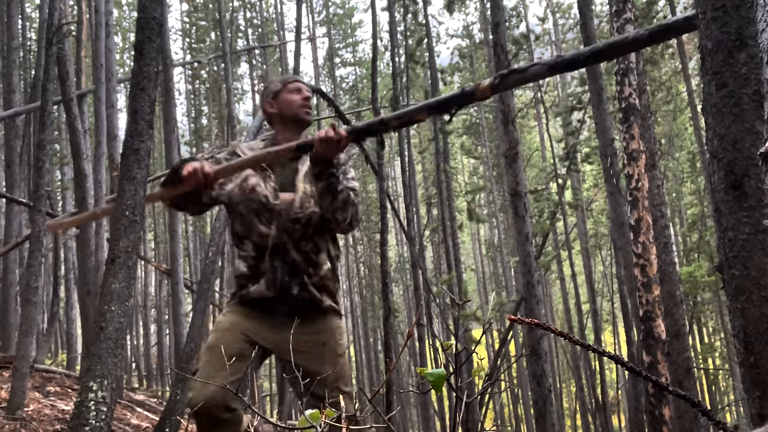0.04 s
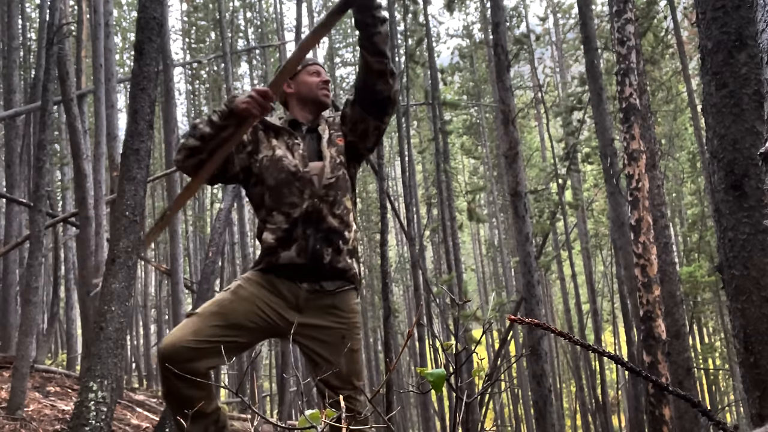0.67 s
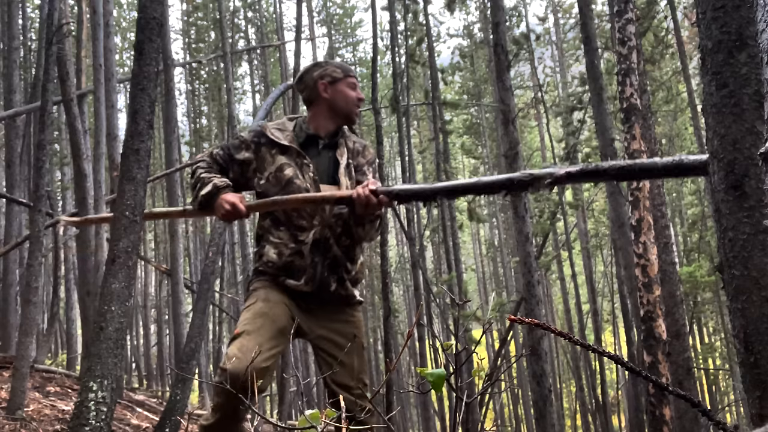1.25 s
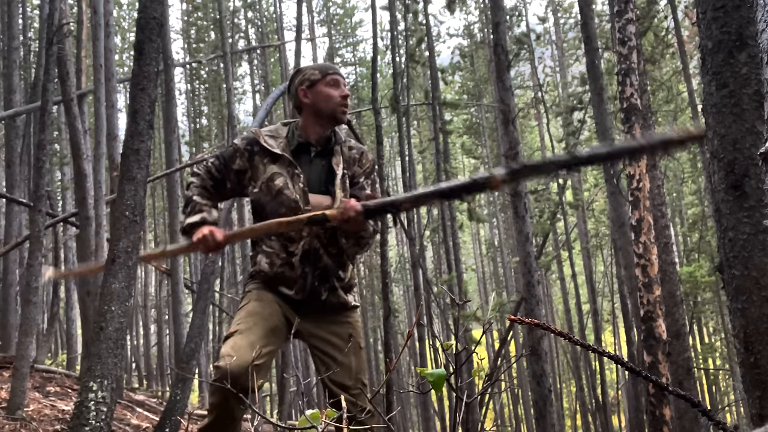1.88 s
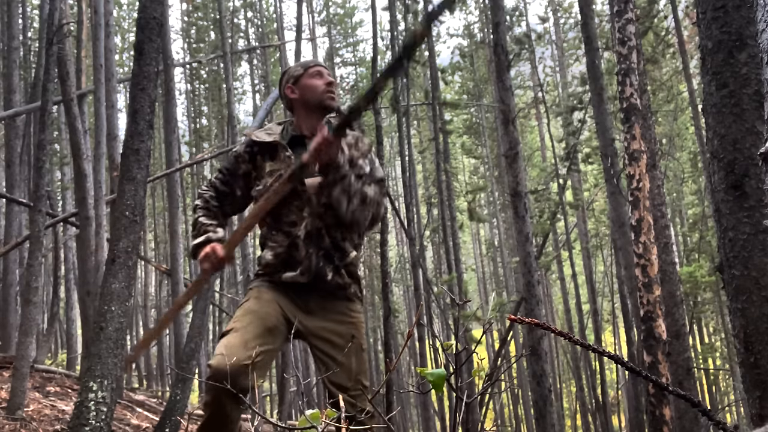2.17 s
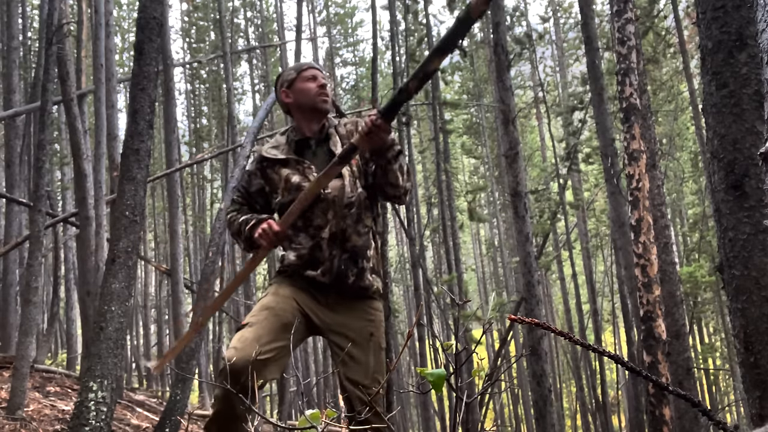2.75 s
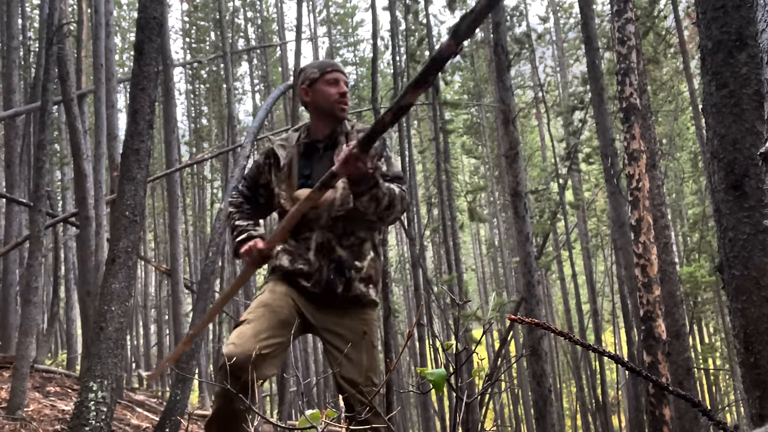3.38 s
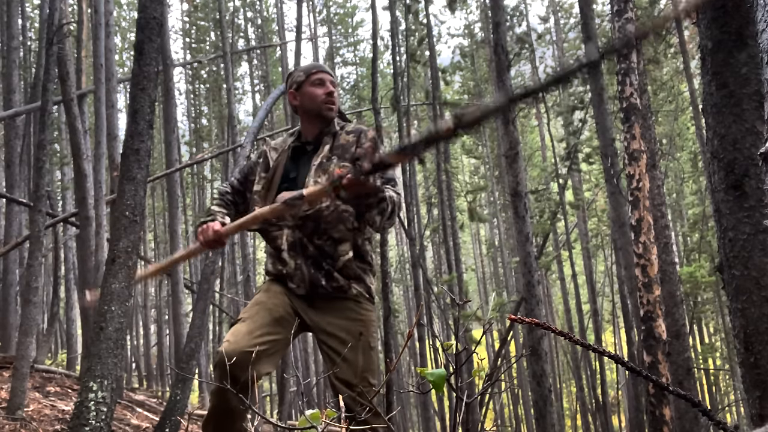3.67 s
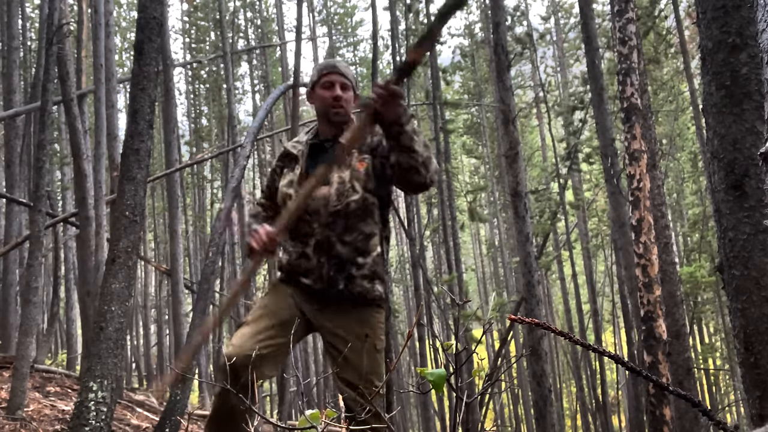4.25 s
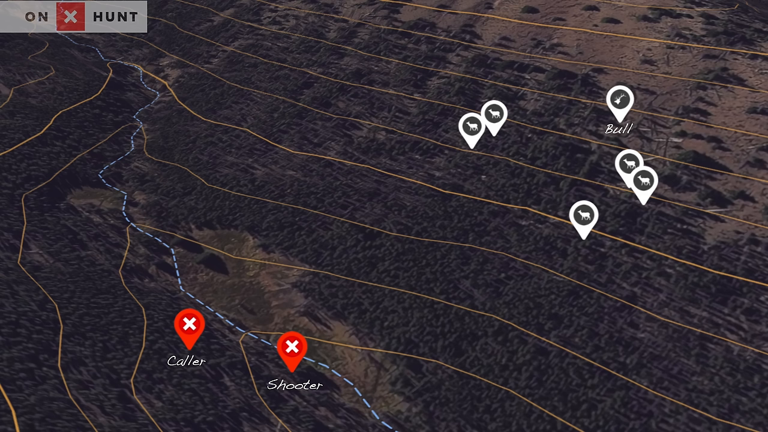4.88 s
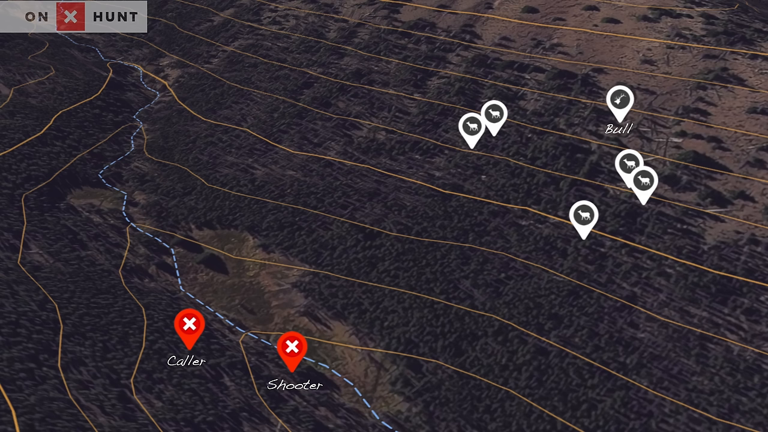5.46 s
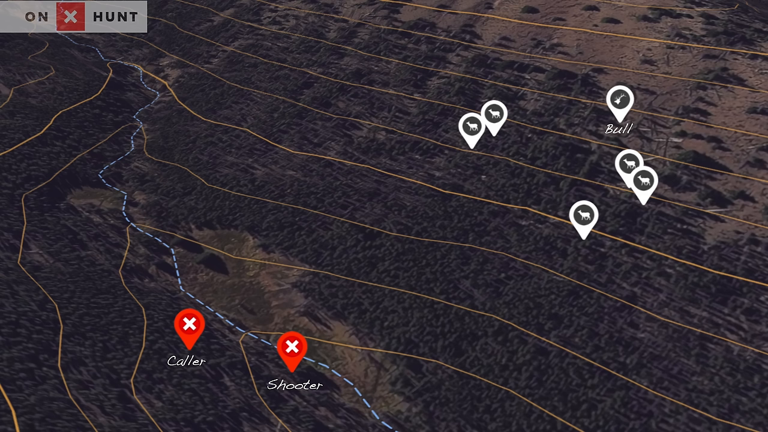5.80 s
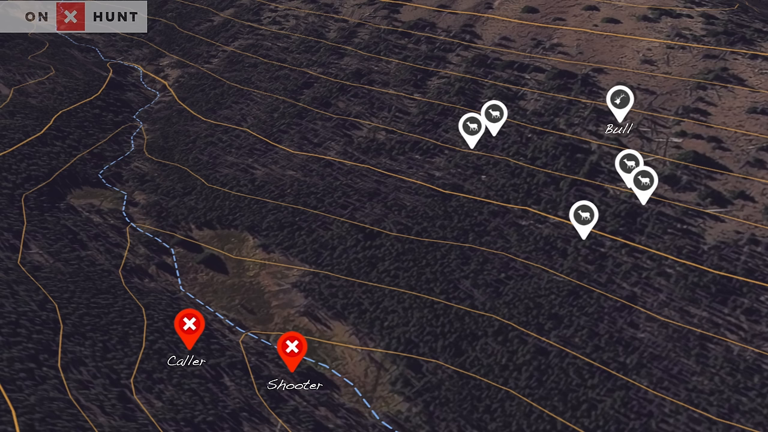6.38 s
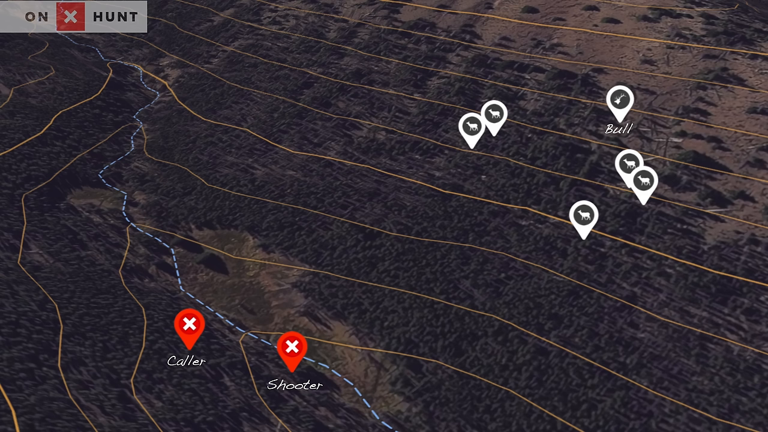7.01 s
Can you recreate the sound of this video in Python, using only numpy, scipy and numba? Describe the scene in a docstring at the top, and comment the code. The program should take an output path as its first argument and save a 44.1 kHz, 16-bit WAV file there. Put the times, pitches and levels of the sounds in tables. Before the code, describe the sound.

A long dead branch is struck and raked against conifer trunks a few metres away. Sharp wooden knocks and crackling scrapes come first, then a short lull. More blows follow, with dry twigs snapping, bark rasping and a low rumble as the branch swings. A last cluster of hard knocks gives way to a few small cracks, over a faint forest hush.

```python
"""A long dead branch is knocked and raked against conifer trunks, a few metres away.
Each blow thumps the branch, knocks on the trunk, splinters dry bark and rebounds; dead twigs snap off.
In swelling scrapes the wood drags over bark in tiny slips and shudders; swinging it adds a low rumble.
The trunks scatter the hits and scrapes back over a faint forest hush and ticking needles."""
import sys
import numpy as np
from scipy import signal
from scipy.fft import rfft, irfft, next_fast_len
from scipy.io import wavfile
from scipy.ndimage import uniform_filter1d
from numba import njit

SR = 44100
rng = np.random.default_rng(int(sys.argv[2]) if len(sys.argv) > 2 else 0)


def output_pcm(signal):
    """Save a mono or channel-first signal as 16-bit PCM at the path in sys.argv[1].

    Samples are clipped to [-1, 1] before scaling.
    """
    pcm = np.clip(np.atleast_2d(signal).T, -1, 1) * 32767
    wavfile.write(sys.argv[1], SR, np.round(pcm).astype(np.int16))


N = 314741
TIME = np.arange(N) / SR
CONTROL_TIME = np.arange(0, N / SR, .001)  # envelope grid, one point a millisecond


def undb(db):
    """Decibels to gain."""
    return 10 ** (np.asarray(db) / 20)


def unit(x):
    """Scale to rms 1."""
    return x / np.sqrt(np.mean(x ** 2) + 1e-30)


def along(points, hz):
    """Read (freq_hz, value) points on a log-frequency axis."""
    point_hz, value = np.transpose(points)
    return np.interp(np.log(hz + 1), np.log(np.maximum(point_hz, 1)), value)


def colour(x, points):
    """Causal EQ through (freq_hz, gain_db) points, built from the cepstrum of its log gain."""
    size = 2 * next_fast_len(x.shape[-1] // 2 + 2048)
    hz = np.arange(size // 2 + 1) * SR / size
    cepstrum = irfft(np.log(undb(along(points, hz))))
    cepstrum[1:size // 2] *= 2
    cepstrum[size // 2 + 1:] = 0
    return irfft(rfft(x, size) * np.exp(rfft(cepstrum)))[..., :x.shape[-1]]


@njit
def svf(x, tuning, damping):
    """State-variable band-pass with a moving centre."""
    y, band, low = np.empty(len(x)), 0., 0.
    for i in range(len(x)):
        g = tuning[i]
        v = (band + g * (x[i] + 1e-18 - low)) / (1 + g * (g + damping))
        band, low = 2 * v - band, low + 2 * g * v
        y[i] = damping * v
    return y


def resonate(x, hz, q):
    """A resonance of sharpness q at a steady or moving pitch."""
    tuning = np.tan(np.pi * np.clip(hz, 20, SR / 3) / SR)
    return svf(x, tuning * np.ones(len(x)), 1 / float(q))


def walk(rate_hz, size):
    """Random levels held 1 / rate_hz seconds and slewed; spread near 1."""
    hold = max(int(SR / rate_hz), 1)
    steps = np.repeat(rng.standard_normal(size // hold + 2), hold)
    return unit(uniform_filter1d(steps, hold)[hold:hold + size])


def swell(peak_s, rise_s, fall_s):
    """Power envelopes, one row a movement: up 20 dB over rise_s, down 20 dB over fall_s."""
    late_s = CONTROL_TIME - peak_s[:, None]
    return undb(-20 * np.maximum(-late_s / rise_s[:, None], late_s / fall_s[:, None])) ** 2


def swell_gain(swells, db, rest_db):
    """The gain of overlapping movements over a resting level, sample by sample."""
    return np.interp(TIME, CONTROL_TIME, np.sqrt(undb(db) ** 2 @ swells + undb(rest_db) ** 2))


def swell_pitch(swells, db, hz, rest_db, rest_hz):
    """Where movements overlap, the pitch leans to the stronger one."""
    power, rest = undb(db) ** 2, undb(rest_db) ** 2
    mean_hz = ((power * hz) @ swells + rest * rest_hz) / (power @ swells + rest)
    return np.interp(TIME, CONTROL_TIME, mean_hz)


# Tone of the forest bed: freq_hz, gain_db
HUSH_EQ = [(20, -18.5), (55, 11), (100, -3.5), (280, -3.5), (550, 2.5), (1000, -2.5), (2000, -7.5),
           (3500, -16.5), (7000, -25), (11500, -32), (14000, -28), (16000, -58)]
def hush(level_db):
    """Faint air in the treetops, alike on both sides only in the bass."""
    apart = colour(rng.standard_normal((2, N)), [(100, -7.5), (400, -3), (900, -2.5)])
    common = colour(rng.standard_normal(N), [(100, 0.5), (400, -4.5), (900, -19.0), (3000, -23.5)])
    air = unit(colour(apart + common, HUSH_EQ))
    drift_db, balance_db = .5 * walk(2.2, N), np.array([[-.7], [.7]])
    return air * undb(level_db + drift_db + balance_db)


def forest_tail(x, db, t60_s):
    """The stand of trunks gives a thin reverb tail with a dull top."""
    t = TIME[:SR]
    tail = rng.standard_normal((2, SR)) * np.exp(-np.log(1000) * t / t60_s) * (1 - np.exp(-t / 0.0069))
    tail = colour(tail, [(80, -9), (600, -8.0), (2000, 0.0), (6000, 4), (14000, -26.0)])
    return signal.fftconvolve(x[None], undb(db) * unit(tail) / np.sqrt(SR), axes=1)[:, :N]


def scatter(x, db, spread_s):
    """Early reflections off the ground and near trunks, different for every point of contact."""
    t = TIME[:SR // 30]
    paths = rng.standard_normal((2, len(t))) * np.exp(-t / spread_s)
    return undb(db) * signal.fftconvolve(x[None], unit(paths) / np.sqrt(len(t)), axes=1)[:, :len(x)]


# Phase between the two microphone ports: freq_hz, left_lead_rad
STEREO_PHASE = [(0, 1), (600, -2), (900, 0.5), (1400, -0.9), (1800, -2.5), (2600, -3.5), (3200, -5.5),
                (3900, -6.5), (5400, -8), (6200, -11.5), (7100, -10.5), (8900, -10), (11000, -6),
                (12300, -6), (13700, -2.5), (15000, -3)]
# Balance between them: freq_hz, left_minus_right_db
STEREO_BALANCE = [(60, -1), (200, -4), (380, -5.5), (650, -13), (1000, -12), (1400, -2.5), (2400, -5.5),
                  (4400, -3), (8000, 0), (15000, 0)]
def ports(x):
    """Mono to stereo: the microphone housing delays and shades the sound differently at its two ports."""
    hz = np.arange(N + 1) * SR / (2 * N)
    ratio = undb(along(STEREO_BALANCE, hz))
    turn = np.exp(.5j * np.interp(hz, *np.transpose(STEREO_PHASE)))
    pair = np.array([ratio * turn, 1 / turn]) * np.sqrt(2 / (1 + ratio ** 2))
    return irfft(rfft(x, 2 * N) * pair)[:, :N]


def litter(rate_hz, db, spread_db):
    """Dry needles and bark crumbs tick faintly at random."""
    count = int(rate_hz * N / SR)
    out, t = np.zeros(N + SR), TIME[:SR // 50]
    for when, brightness, softness in rng.random((count, 3)):
        crumb = fracture(t, splinter_s=.0012, break_s=.0003, splinter_db=-9.0)
        tick = unit(resonate(crumb, 2000 * 5 ** brightness, q=1.2))
        start = int(when * N)
        out[start:start + len(t)] += undb(db - spread_db * softness) * tick
    return out[:N]


def rumble(hz, gain):
    """Low random wobble around a pitch, mostly alike left and right."""
    shakes = [resonate(resonate(noise, hz, q=0.99), hz, q=1.0) for noise in rng.standard_normal((2, N))]
    common, apart = (unit(shake / np.sqrt(hz)) * gain for shake in shakes)
    return undb(-1.0) * common + undb(-5) * apart * np.array([[1], [-1]])


# Low swells under the action: peak_s, rise_s, fall_s, level_db, pitch_hz
SWING_CUES = [(0.0, .05, .09, -43.5, 98), (0.42, .35, 0.23, -44, 75.2), (0.95, 0.12, 0.22, -46, 70),
              (1.2, .2, 0.095, -36.5, 75), (1.68, 0.35, 0.1, -60.5, 115), (2.675, .03, 0.023, -40, 125),
              (3.003, 0.049, .04, -39, 54), (3.072, 0.017, .035, -35, 64), (3.165, 0.028, 0.13, -37, 84.7),
              (3.28, 0.17, 0.059, -41.5, 57.1), (3.607, 0.034, .15, -43, 57), (3.75, 0.11, 0.38, -45, 58.1),
              (3.95, .35, .3, -40, 64.2), (4.36, 0.073, 0.2, -32.5, 68), (4.435, 0.076, 0.11, -32, 60.7),
              (4.55, 0.046, 0.14, -36.5, 62.4), (4.707, .035, .09, -40.5, 62),
              (5.757, 0.082, .2, -45.5, 100), (5.9, 0.13, .06, -46, 66), (6.136, .15, 0.14, -38.5, 72),
              (6.33, 0.06, .25, -44.5, 68), (6.525, .1, 0.071, -47.5, 90), (6.81, .15, .09, -44.5, 78),
              (7.08, 0.2, 0.24, -50, 92)]
def swinging(rest_db):
    """The heavy branch rumbles as it is swung and heaved."""
    peak_s, rise_s, fall_s, level_db, pitch_hz = np.transpose(SWING_CUES)
    swings = swell(peak_s, rise_s, fall_s)
    centre_hz = swell_pitch(swings, level_db, pitch_hz, rest_db, rest_hz=85)
    return rumble(centre_hz, swell_gain(swings, level_db, rest_db))


# Modes of the branch, low to high: pitch_hz, level_db, t60_s
BRANCH_MODES = [(68.6, -6, 0.21), (109, -9, 0.18), (164.2, 1.5, 0.071), (219.3, 0.5, 0.08),
                (282.5, 6, 0.04), (388, -7.5, 0.048), (455, -10.5, 0.068), (570, -12, 0.047),
                (682, -22, 0.038), (798, -4.5, 0.057), (978, 3, 0.03), (1257, 7, 0.02), (1380, -11, 0.089),
                (1895, -3, 0.18), (1998, -4, 0.084), (2326, -24.5, 0.12)]
BENDING_MODES, UPPER_MODES = BRANCH_MODES[:5], BRANCH_MODES[5:]
def ring(modes, t, scatter_db):
    """The branch rings; every point of contact favours other modes."""
    hz, db, t60_s = np.transpose(modes)[:, :, None]
    favour, detune, side = rng.standard_normal((3, len(modes), 1))
    waves = np.sin(2 * np.pi * hz * (1 + 0.076 * detune) * t) * np.sign(side)
    return np.sum(undb(db + scatter_db * favour) * waves * np.exp(-np.log(1000) * t / t60_s), axis=0)


def slips(rate_hz, spread_db):
    """Tiny stick-slip clicks at random moments, of very unequal size."""
    sizes = undb(spread_db * np.minimum(rng.exponential(size=N), 4))
    return unit((rng.random(N) < rate_hz / SR) * sizes * rng.choice([-1, 1], N))


# Woody body of a scrape: freq_hz, gain_db
RASP_EQ = [(120, -27.5), (350, -0.5), (800, -0.5), (1500, -5.5), (2400, 3), (3300, -12.5), (6000, -29.5)]
def rasp(centre_hz):
    """Coarse slips rasp in the branch; each catch has its own stiffness, so the pitch hops about."""
    coarse = unit(colour(slips(rate_hz=1400, spread_db=2.5), RASP_EQ))
    wood = signal.fftconvolve(coarse, ring(UPPER_MODES, TIME[:SR // 8], scatter_db=1))[:N]
    catch = resonate(coarse, centre_hz * 2 ** (.15 * walk(45, N)), q=7)
    return unit(catch) + undb(6) * coarse + undb(1) * unit(wood)


# Crisp top of a scrape: freq_hz, gain_db
GRIT_EQ = [(1200, -9), (2800, -2.5), (4200, -3.5), (7000, 3), (9000, 2.5), (11500, 1), (14000, 0),
           (16000, -24)]
def grit():
    """Fine bark flakes crackle; now and then a whole scale flicks off with a dry click."""
    flakes = unit(colour(slips(rate_hz=4000, spread_db=2.5), GRIT_EQ))
    chirr = resonate(flakes, 4600 * 2 ** (0.52 * walk(70, N)), q=11)
    scales = colour(slips(rate_hz=45, spread_db=1.5), GRIT_EQ)
    return flakes + undb(-8) * unit(chirr) + undb(-5) * unit(scales)


# Strokes of the branch over bark: peak_s, rise_s, fall_s, rasp_db, rasp_hz, grit_db, shudder_db
SCRAPE_CUES = [(0.289, 0.2, 0.1, -42, 1250, -35.5, -45), (0.409, 0.1, 0.13, -38.5, 1240, -32.5, -36),
               (0.815, 0.013, .12, -46, 730, -47, -46.5), (0.928, 0.073, 0.29, -37, 1400, -37.5, -38.5),
               (1.11, 0.22, .13, -34.5, 1360, -34.5, -37.5), (1.462, .03, 1, -67, 750, -59.5, -64),
               (2.383, 0.01, 0.094, -32.5, 2383, -28.5, -68), (2.468, 0.037, 0.2, -36.5, 1570, -34.5, -52),
               (2.575, .06, 0.19, -55.5, 790, -42, -58), (3.003, .2, .1, -54, 1880, -48, -59),
               (3.135, 0.057, 0.087, -46.5, 720, -39, -54), (3.183, .025, 0.14, -40, 2085, -38, -36),
               (3.487, 0.21, 0.064, -45, 1564, -49.5, -67), (3.641, 0.028, .065, -53, 2217, -42.5, -56),
               (3.706, .014, 0.1, -52, 2150, -37, -56), (3.87, .02, 0.15, -66.5, 700, -49.5, -58),
               (4.045, 0.092, 0.19, -43.5, 900, -43, -35), (4.12, 0.14, 0.11, -40, 1180, -35, -40),
               (4.192, 0.059, 0.045, -32.5, 1800, -40, -42), (4.294, 0.037, 0.091, -38.5, 1700, -47, -91),
               (4.36, 0.06, 0.042, -35.5, 1256, -34, -41), (4.455, 0.019, 0.046, -61, 980, -44.5, -64),
               (4.684, 0.022, 0.17, -59, 818, -54.5, -61), (4.874, 0.015, 0.089, -34, 810, -37.5, -33),
               (4.909, 0.031, 0.032, -35, 1480, -28, -38), (4.992, 0.018, 0.064, -34, 1100, -33.5, -36),
               (5.298, 0.2, 0.046, -46, 1110, -43, -43), (5.334, 0.0079, 0.021, -34, 1030, -32, -43),
               (5.365, .016, 0.051, -34.5, 1230, -36, -37.5), (5.412, 0.019, 0.069, -29, 2540, -33.5, -48),
               (5.462, 0.07, 0.04, -27.5, 1210, -35, -46), (5.965, 0.043, 0.16, -49.5, 650, -56.5, -44.5),
               (6.121, .027, .018, -27.5, 808, -30.5, -38),
               (6.226, 0.044, 0.042, -36.5, 1180, -33.5, -38.5), (6.45, 0.08, 0.055, -52.5, 820, -58, -56),
               (7.011, 0.03, .036, -38.5, 2150, -39.5, -51)]
def dragging(rest_rasp_db=-73, rest_grit_db=-70):
    """Wood catches and slips on bark; between strokes it still shifts a little in the hands."""
    peak_s, rise_s, fall_s, rasp_db, rasp_hz, grit_db, _ = np.transpose(SCRAPE_CUES)
    strokes = swell(peak_s, rise_s, fall_s)
    centre_hz = swell_pitch(strokes, rasp_db, rasp_hz, rest_rasp_db, rest_hz=736)
    grip = walk(110, N)
    body = swell_gain(strokes, rasp_db, rest_rasp_db) * unit(rasp(centre_hz) * undb(2.95 * grip))
    top = swell_gain(strokes, grit_db, rest_grit_db) * unit(grit() * undb(1.1 * grip))
    return body + top


def shudder(pitch_hz, rest_db):
    """The heavy branch shudders with every scrape."""
    peak_s, rise_s, fall_s, *_, shudder_db = np.transpose(SCRAPE_CUES)
    return rumble(pitch_hz, swell_gain(swell(peak_s, rise_s, fall_s), shudder_db, rest_db))


def fracture(t, splinter_s, break_s, splinter_db):
    """Dry fibres give way together, then smaller splinters follow in a dying rattle."""
    rupture = (t / break_s * np.exp(1 - t / break_s)) ** 2
    splinters = undb(splinter_db + 8.2 * walk(1400, len(t)))
    rattle = splinters * np.exp(-t / splinter_s) * (1 - np.exp(-t / break_s))
    linger = undb(-28.5) * np.exp(-t / 0.0096)
    return (rupture + rattle + linger) * rng.choice([-1, 1], len(t))


# Mid bite of cracking bark and bright edge of snapping fibres: freq_hz, gain_db
CRACK_EQ = [(500, -44.5), (1100, 2), (1700, 6), (3000, -5), (5000, -3), (6500, 1.5), (10000, -18.5)]
SNAP_EQ = [(2500, -22.5), (5000, -9.5), (6800, -1), (9000, 1.5), (11500, 2), (14000, -3.5), (16000, -9.5)]
def hit(thud_db, knock_db, knock_hz, crack_db, crack_hz, snap_db, splinter_s):
    """One contact in four layers: bending thud, hollow knock, cracking bark and its bright snap."""
    t = TIME[:SR // 5]
    thud = ring(BENDING_MODES, t, scatter_db=3.5) * (1 - np.exp(-t / 0.0019))
    # the trunk is heavily damped: its knock dies within two or three cycles
    push = t * np.exp(-t / 0.00014)
    trunk = resonate(resonate(push, knock_hz, q=1.02), knock_hz, q=0.92)
    # a soft, low knock favours the lower modes of the branch
    branch = resonate(ring(UPPER_MODES, t, scatter_db=4.5), knock_hz, q=1.4)
    knock = unit(trunk) + undb(-5.5) * unit(resonate(branch, knock_hz, q=1.0))
    # the breaking sliver of bark rings at its own pitch and at a higher bending mode
    bark = colour(fracture(t, splinter_s, break_s=0.00074, splinter_db=-4.5), CRACK_EQ)
    crack = unit(bark) + undb(2) * unit(resonate(bark, crack_hz, q=6.2))
    fibres = colour(fracture(t, splinter_s, break_s=0.0003, splinter_db=-1.5), SNAP_EQ)
    snap = unit(fibres) + undb(-23.5) * unit(resonate(fibres, 1.8 * crack_hz, q=4.5))
    layers = [(thud_db, thud), (knock_db, knock), (crack_db, crack), (snap_db, snap)]
    mix = sum(undb(db) * unit(layer) for db, layer in layers)
    return mix * np.sqrt(.01 / t[-1])  # levels count each layer's energy as if packed into 10 ms


# Twig breaks: start_s, crack_db, crack_hz, snap_db, splinter_s
TWIG_CUES = [(0.4643, -43, 1980, -35.5, 0.0051), (0.7555, -76, 2390, -53, 0.0065),
             (0.9393, -22.5, 4170, -24.5, 0.0018), (1.272, -77, 2270, -53, 0.001),
             (1.326, -62, 1850, -74, 0.0011), (1.5967, -60, 4140, -47.5, 0.00057),
             (1.8588, -59, 2500, -80, 0.001), (2.0872, -58, 3600, -47.5, 0.0006),
             (2.1757, -55.5, 2840, -70, 0.0013), (2.2697, -55, 2450, -63, 0.001),
             (2.398, -25.5, 2510, -26, 0.0011), (2.424, -42, 2700, -38.5, 0.00064),
             (2.486, -44, 1800, -53, 0.003), (2.5264, -33.5, 4200, -23, 0.0021),
             (2.5877, -40, 4170, -45, 0.0046), (2.6877, -57, 4480, -56, 0.0011),
             (2.828, -55.5, 2630, -50, 0.0065), (2.955, -47, 5500, -64, 0.0013),
             (3.1094, -62, 5800, -35, 0.0011), (3.1688, -87, 2220, -39.5, 0.0028),
             (3.273, -49, 2810, -43, 0.0011), (3.37, -45.5, 3020, -45, 0.05),
             (3.4614, -43, 2190, -43, 0.0012), (3.6142, -43.5, 4740, -31.5, 0.0018),
             (3.6392, -38, 2630, -34, 0.00083), (3.71, -41.5, 4670, -33, 0.0043),
             (3.813, -57, 4350, -45.5, 0.0053), (3.889, -56.5, 4300, -43, 0.0026),
             (4.165, -51, 4000, -35, 0.0013), (4.376, -55, 4000, -35.5, 0.0017),
             (4.7915, -66, 4400, -45.5, 0.0011), (4.9726, -46, 2750, -37, 0.014),
             (5.041, -53, 4000, -62, 0.001), (5.1633, -55, 2240, -53, 0.001),
             (5.2389, -47, 5340, -39.5, 0.0036), (5.2965, -42, 5130, -30.5, 0.003),
             (5.3804, -32, 5700, -31, 0.003), (5.922, -53.5, 2010, -57, 0.0016),
             (5.977, -46, 3100, -29.5, 0.0061), (6.4049, -45.5, 1800, -58, 0.0063),
             (6.4848, -48.5, 3240, -54.5, 0.0011), (6.571, -57.5, 2480, -61.5, 0.0017),
             (6.9859, -31, 2230, -37.5, 0.0034), (7.0172, -35.5, 2670, -53, 0.0016)]
def twigs(knock_hz=980):
    """Dead twigs snap off, jolting the branch only lightly; yields (start_s, sound)."""
    for start_s, crack_db, crack_hz, snap_db, splinter_s in TWIG_CUES:
        thud_db, knock_db = crack_db - 20, crack_db - 13.5
        yield start_s, hit(thud_db, knock_db, knock_hz, crack_db, crack_hz, snap_db, splinter_s)


# Blows of the branch on a trunk:
# start_s, thud_db, knock_db, knock_hz, crack_db, crack_hz, snap_db, splinter_s, rebound_db
BLOW_CUES = [(0.265, -30.5, -33.5, 720, -28.5, 3750, -21, 0.0022, -2.5),
             (0.377, -39, -37, 940, -38.5, 4500, -38, 0.026, -12),
             (0.392, -30.5, -25.5, 711, -23, 3570, -21.5, 0.0028, -2),
             (0.488, -39, -34.5, 397, -50, 4080, -45, 0.013, -13),
             (0.578, -57, -51, 890, -55, 2450, -53, 0.004, -17),
             (0.924, -35, -27, 646, -32, 4030, -28, 0.0073, -16),
             (1.08, -33.5, -37, 1130, -45, 2350, -50, 0.0056, -10),
             (1.1491, -31.5, -35.5, 880, -27, 2110, -35, 0.0016, -8),
             (1.302, -54, -47, 406, -67, 2300, -68, 0.0042, -23),
             (2.5674, -27.5, -20.5, 563, -24, 2670, -20.5, 0.0018, -4.5),
             (2.656, -43, -41, 603, -66, 3860, -65, 0.0008, -15),
             (3.1406, -35, -30.5, 670, -42, 2950, -38, 0.0016, -11),
             (3.1957, -42, -48, 685, -46, 3900, -45, 0.0082, -11),
             (3.961, -37.5, -49, 343, -54, 5440, -51, 0.015, -19),
             (4.151, -32, -40, 750, -46, 1940, -44, 0.0008, -14),
             (4.291, -55.5, -38.5, 1020, -39, 1860, -60, 0.0047, -16),
             (4.41, -42.5, -61, 400, -72, 1800, -67, 0.009, -14),
             (4.87, -25.5, -27.5, 597, -33.5, 2380, -37, 0.0037, 2.5),
             (4.9286, -33, -33.5, 900, -42, 2300, -33.5, 0.0016, 1),
             (5.961, -27.5, -18, 626, -50, 1690, -32.5, 0.0029, -19),
             (5.9679, -27, -46, 510, -40.5, 3660, -34.5, 0.0048, -18),
             (5.9835, -34.5, -42, 655, -43.5, 2540, -35, 0.0068, 3),
             (6.0931, -33, -25.5, 804, -26, 2150, -28, 0.0026, -13.5),
             (6.108, -25, -23.5, 556, -31, 2110, -49, 0.0027, -9),
             (6.178, -43.5, -45, 1190, -60, 2090, -63, 0.0034, -14),
             (6.2036, -33.5, -33, 1190, -36, 3100, -39, 0.0013, -17)]
def blows(rebound_s=.0048, rebound_pitch=.75):
    """The springy branch strikes and lands again at once, lower and duller; yields (start_s, sound)."""
    for start_s, *strike, rebound_db in BLOW_CUES:
        yield start_s, hit(*strike)
        thud_db, knock_db, knock_hz, crack_db, crack_hz, snap_db, splinter_s = strike
        rebound = hit(thud_db, knock_db - 3, knock_hz * rebound_pitch,
                      crack_db, crack_hz * rebound_pitch, snap_db - 6, splinter_s)
        yield start_s + rebound_s, undb(rebound_db) * rebound


def impacts():
    """Blows and twig breaks on the timeline: the mono direct sound and its stereo reflections."""
    out = np.zeros((3, N + SR))
    for source in (blows(), twigs()):
        for start_s, sound in source:
            start = int(start_s * SR)
            reflections = scatter(sound, db=-6.5, spread_s=0.0065)
            out[:, start:start + len(sound)] += np.vstack([sound, reflections])
    return out[0, :N], out[1:, :N]


def scene():
    """The branch at work among the trees: direct wood, stereo width, tail, low end and forest bed."""
    hits, reflections = impacts()
    wood = hits + dragging() + litter(rate_hz=7.3, db=-70.5, spread_db=8)
    # the long branch rubs at several places at once, so part of the scrape differs left and right
    width = undb(-14.0) * dragging() * np.array([[1], [-1]])
    diffuse_eq = [(100, -6.0), (600, 0.0), (1500, 2), (5000, 8), (9000, -3.0), (15000, 4.5)]
    diffuse = colour(reflections + width, diffuse_eq)
    tail = forest_tail(wood, db=-24.5, t60_s=.5)
    low_end = shudder(pitch_hz=136.2, rest_db=-72.5) + swinging(rest_db=-72.5)
    return ports(wood) + diffuse + tail + low_end + hush(level_db=-55.5)


def record(dry):
    """Master chain: low cut at 32 Hz, soft clip on the peaks, steep high cut at 16 kHz."""
    low_cut = signal.butter(2, 32, "high", fs=SR, output="sos")
    high_cut = signal.ellip(8, .2, 70, 16000, fs=SR, output="sos")
    return signal.sosfilt(high_cut, np.tanh(signal.sosfilt(low_cut, dry)))


dry = scene()
out = record(dry)
output_pcm(out)
```